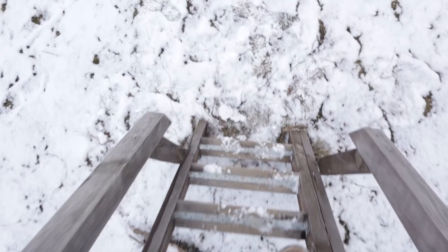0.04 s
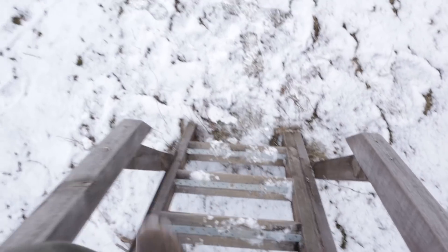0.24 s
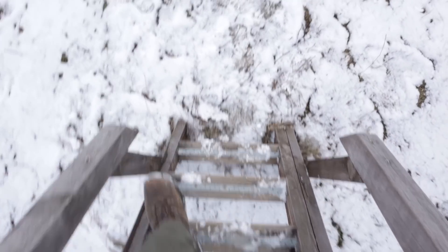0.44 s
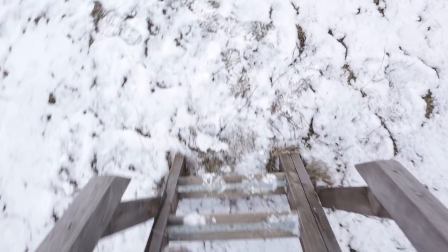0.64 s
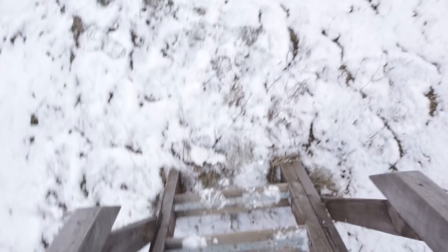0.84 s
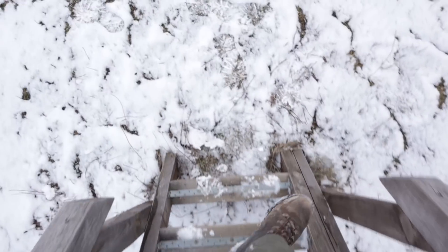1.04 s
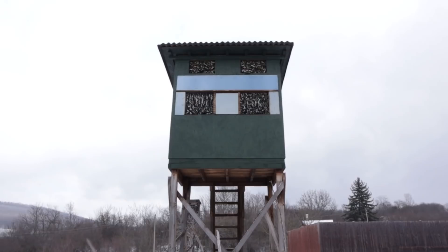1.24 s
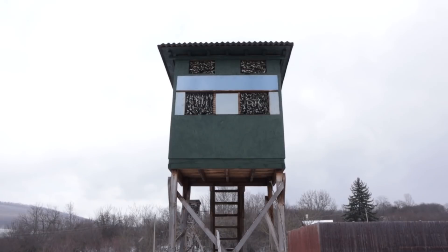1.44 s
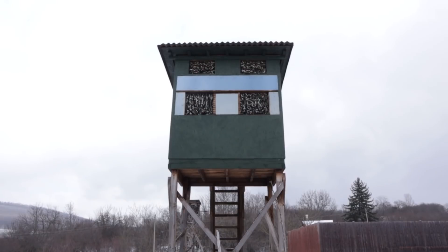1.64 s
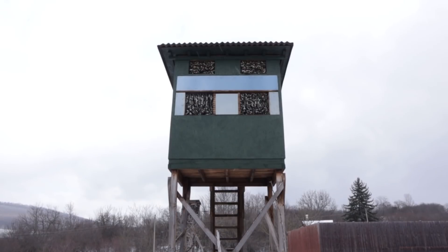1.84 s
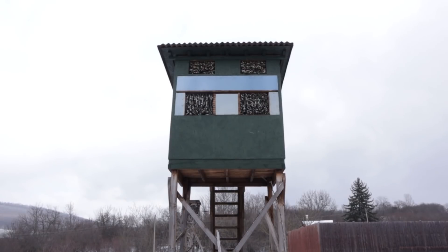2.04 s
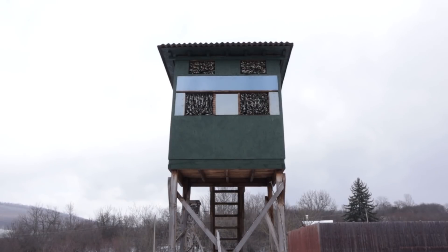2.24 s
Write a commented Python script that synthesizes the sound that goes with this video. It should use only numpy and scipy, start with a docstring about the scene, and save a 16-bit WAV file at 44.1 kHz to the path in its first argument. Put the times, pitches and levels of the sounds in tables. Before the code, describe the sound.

Close boot steps knock twice on a wooden ladder outdoors, with short scrapes and clothing rubbing along the rails. A brief snow crunch and low thuds follow, before a sudden change to soft wind and thin, far-off bird chirps.

```python
"""Boots climb down a snowy wooden ladder, close by. Soles knock and scrape on the rungs at 0.1 s and
again at 0.7 s, ringing the wood and cracking grit, while clothes rustle and rub along the rails.
Near 0.94 s snow crunches and the climber's weight lands with dull thuds. At 1.26 s the rustle cuts off,
leaving quiet open air: a low breeze, a few distant birds and a far-off hush."""
import sys
import numpy as np
from scipy import signal
from scipy.fft import rfft, irfft
from scipy.io import wavfile

SR = 44100
rng = np.random.default_rng(int(sys.argv[2]) if len(sys.argv) > 2 else 0)


def put_to_file(sound):
    """Save the sound as 16-bit audio at rate SR, in the file named by the first command-line argument."""
    columns = np.atleast_2d(sound).T  # one column per channel
    safe = np.clip(columns, -1, 1)
    whole_steps = np.round(safe * 32767)
    wavfile.write(sys.argv[1], SR, whole_steps.astype(np.int16))


N = 105840


def undb(db):
    """Decibels to gain."""
    return 10 ** (np.asarray(db) / 20)


def seconds():
    """Time of every sample."""
    return np.arange(N) / SR


def envelope(points):
    """Gain along (t/s, level/dB) points."""
    return undb(np.interp(seconds(), *np.array(points).T))


def colour(x, points):
    """Filter by (f/Hz, level/dB) points, keeping the power of white noise."""
    hz, db = np.array(points).T
    f = np.maximum(np.fft.rfftfreq(N, 1 / SR), 1)
    skirts = np.minimum(f / hz[0], 1) ** 2 * np.minimum(hz[-1] / f, 1) ** 2
    gain = undb(np.interp(np.log(f), np.log(hz), db)) * skirts
    return irfft(rfft(x) * gain / np.sqrt(np.mean(gain ** 2)), N)


def noise(points):
    """Coloured noise, unit RMS."""
    return colour(rng.standard_normal(N), points)


def wander(rate_hz):
    """Random drift, spread near 1."""
    knots = rng.standard_normal(N)
    return np.interp(seconds() * rate_hz, np.arange(N), knots)


def decay(t, t60_s):
    """Exponential decay from t = 0."""
    return (t >= 0) * np.exp(-np.log(1000) * np.maximum(t, 0) / t60_s)


def swell(start_s, length_s):
    """Rounded rise and fall."""
    progress = np.clip((seconds() - start_s) / length_s, 0, 1)
    return np.sqrt(np.maximum(np.sin(np.pi * progress), 0))


def slips(rate_hz=2500, scatter_db=2):
    """Dense, uneven stick-slip clicks, unit RMS."""
    hits = rng.random(N) < rate_hz / SR
    clicks = hits * undb(scatter_db * rng.standard_normal(N)) * rng.choice([-1, 1], N)
    return clicks / clicks.std()


# Sole on rung: t/s, level/dB, f/Hz, relative ring/dB, relative clack/dB, relative grit/dB
RUNG_CONTACTS = [(.1025, -17.5, 687, -2.5, -9, -15.5), (0.1299, -27, 1460, -18, -1, -13.5),
                 (0.143, -13.5, 1390, -8.5, -25, -22.5), (0.1505, -52, 1490, 10, -17, -22),
                 (0.1671, -29.5, 2020, -21, -24, -17), (0.1721, -29.5, 537, 8.5, -5, -26),
                 (.1876, -34.5, 596, -12, -13, -18), (.2342, -35.5, 790, 8, -20, -16),
                 (.2475, -34.5, 1760, -20, -23, -19), (.324, -40.5, 674, 5, -15, -3.5),
                 (0.3287, -29, 473, 8.5, -9, -22.5), (0.7261, -21, 590, 3.5, -2.5, -18.5),
                 (0.7456, -32.5, 810, 0, -3, -14), (0.765, -33.5, 1400, 0, -12, -6.5),
                 (.7905, -40, 1370, -3, -3, -21)]
# Ladder modes: f/Hz, relative level/dB, t60/s
LADDER_MODES = [(191, -22, 0.069), (283, -10, 0.067), (340, 2.5, 0.049), (530, -11, 0.038),
                (630, -14, 0.026), (690, -4, 0.11), (820, -3, 0.052), (980, -16, 0.039), (1220, -29, .05),
                (1340, -8, 0.069), (1532, 3, 0.11), (1780, 0, .05), (3040, 0, .03), (3760, 7, .03)]
# Cracking grit: f/Hz, level/dB
GRIT_SPECTRUM = [(300, -0.5), (1500, 8.5), (2400, -1), (3200, -5), (4100, -4), (4800, -5), (5500, -5.5),
                 (6800, -13), (8200, -7.5), (9500, -20), (15000, -19)]


def knocks(width_cycles=.44, phase_rad=.15, clack_hz=1607, modes_db=-15, frame_db=-2):
    """Each contact is a short push that rings the ladder, clacks the hard sole and cracks grit."""
    t = seconds()
    direct, drive, grit = np.zeros((3, N))
    for start_s, db, hz, ring_db, clack_db, grit_db in RUNG_CONTACTS:
        cycles = (t - start_s) * hz
        pulse = np.exp(-.5 * (cycles / width_cycles) ** 2)
        push = undb(db) * pulse * np.cos(2 * np.pi * cycles + phase_rad)
        touch_s = t - start_s + .5 / hz  # from half a cycle before the pulse peak
        clack = decay(touch_s, t60_s=.014) * np.sin(2 * np.pi * clack_hz * touch_s)
        direct += push + undb(db + clack_db) * clack
        drive += undb(ring_db) * push * 2 / pulse.sum()
        grit += undb(db + grit_db) * decay(touch_s, t60_s=.036)
    modes = sum(undb(db) * decay(t, t60_s) * np.sin(2 * np.pi * hz * t)
                for hz, db, t60_s in LADDER_MODES)
    frame = rng.standard_normal(N) * decay(t, t60_s=.099)  # dense ring of rails and joints
    ring = signal.fftconvolve(drive, undb(modes_db) * modes + undb(frame_db) * frame)[:N]
    return direct + ring + grit * noise(GRIT_SPECTRUM)


# Weight on the frame: t/s, level/dB, f/Hz, attack/s, t60/s
FRAME_LOADS = [(0.174, -52, 141, .003, 0.047), (0.3293, -44, 330, 0.0011, 0.22), (.73, -38, 171, .003, .13),
               (0.743, -36.5, 285.6, .004, .1), (.888, -33.5, 114.4, 0.019, 0.15),
               (0.9421, -24, 80.4, 0.0037, 0.14), (0.9445, -25.5, 165, 0.0019, 0.055),
               (0.9453, -26, 260, 0.0018, 0.048), (1.008, -31.5, 169.7, 0.0078, 0.15),
               (1.019, -33.5, 113, 0.0083, 0.18), (1.036, -37, 75.3, .02, 0.17)]


def thuds():
    """Low, quickly damped swings of the frame under the climber's weight."""
    out = np.zeros(N)
    for start_s, db, hz, attack_s, t60_s in FRAME_LOADS:
        t = seconds() - start_s
        rise = np.clip(t / attack_s, 0, 1)
        fall = decay(np.maximum(t - attack_s, 0), t60_s)
        out -= undb(db) * rise * fall * np.sin(2 * np.pi * hz * t)
    return out


# Slides on a rung: t/s, length/s, level/dB, relative grit/dB
SOLE_SLIDES = [(0.106, 0.025, -45.5, -6), (.127, 0.014, -37, -18), (0.147, 0.015, -41.5, -15),
               (0.17, 0.008, -35.5, -16), (0.208, 0.05, -55.5, -4), (0.76, 0.015, -39.5, -21),
               (0.786, 0.012, -42, -12), (0.804, 0.065, -68, 12)]
# Sole friction: f/Hz, level/dB
SOLE_SPECTRUM = [(80, -26), (180, 1), (550, -8), (950, -13), (1480, 1.5), (1900, -15), (2600, -15),
                 (5000, -31)]


def scrapes():
    """The sole judders over the wood, grinding grit."""
    rubbing, grit = np.zeros((2, N))
    for start_s, length_s, db, grit_db in SOLE_SLIDES:
        slide = swell(start_s, length_s)
        rubbing += undb(db) * slide
        grit += undb(db + grit_db) * slide
    return colour(slips() * rubbing, SOLE_SPECTRUM) + colour(slips() * grit, GRIT_SPECTRUM)


# Snow crushed underfoot: t/s, length/s, squeak/dB, fizz/dB
SNOW_CRUNCHES = [(0.275, .004, -72, -64), (0.79, 0.0015, -54, -51), (0.87, 0.0053, -51, -61),
                 (0.931, 0.0055, -43, -48.5), (.937, .007, -42, -72)]
# Snow squeak: f/Hz, level/dB
SQUEAK_SPECTRUM = [(200, -11), (450, 3), (850, -6), (1300, -14.5), (2400, -18), (6000, -28.5)]


def snow():
    """Packed snow gives way with a dull squeak and a bright fizz."""
    squeak, fizz = np.zeros((2, N))
    for start_s, length_s, squeak_db, fizz_db in SNOW_CRUNCHES:
        crush = swell(start_s, length_s)
        squeak += undb(squeak_db) * crush
        fizz += undb(fizz_db) * crush
    return colour(slips() * squeak, SQUEAK_SPECTRUM) + fizz * slips()


# Cloth rustle; duller rub on wood: t/s, level/dB
RUSTLE_LEVELS = [(0, -56.5), (.07, -55), (.12, -57.5), (.21, -62.5), (.25, -58), (.31, -66.5), (.42, -65),
                 (.52, -57), (.58, -58.5), (.63, -63), (.71, -78), (.77, -55), (.87, -55), (.9, -75),
                 (1.0, -82), (1.14, -62.5), (1.26, -62.5)]
RUB_LEVELS = [(0, -61), (.09, -55.5), (.2, -52), (.3, -57.5), (.44, -59), (.51, -56), (.6, -64.5),
              (.7, -59), (.8, -52.5), (.9, -59), (.98, -59), (1.07, -54.5), (1.25, -56.5)]
# Rustle; rub: f/Hz, level/dB
RUSTLE_SPECTRUM = [(200, -4), (500, 2.5), (1500, 4), (3000, -4), (6000, -1.5), (8300, -3), (10000, -9.5),
                   (12500, -9.5), (15500, -22)]
RUB_SPECTRUM = [(80, 3), (200, -3), (400, -2), (600, 0), (780, 1), (1000, -7), (2200, -6.5), (3000, -15),
                (8000, -28), (15000, -51)]


def clothes(grain_db=1.55, stop_s=1.259, ramp_s=.004):
    """Cloth rustles and rubs along the rails, then cuts off."""
    grain = undb(grain_db * wander(rate_hz=120))
    rustle = envelope(RUSTLE_LEVELS) * noise(RUSTLE_SPECTRUM)
    rub = envelope(RUB_LEVELS) * noise(RUB_SPECTRUM)
    gate = np.clip((stop_s - seconds()) / ramp_s + .5, 0, 1)
    return (rustle + rub) * grain * gate


# Bird notes: t/s, length/s, start f/Hz, middle f/Hz, end f/Hz, relative level/dB
BIRD_NOTES = [(1.122, .02, 6300, 6100, 5900, -61), (1.378, .048, 3850, 4050, 4650, -64),
              (1.427, .02, 3450, 3700, 3500, -64), (1.44, .068, 3300, 2830, 2480, -62),
              (1.455, .032, 3750, 3650, 3400, -62), (1.486, .03, 6950, 7530, 6980, -63),
              (1.494, .026, 3050, 2800, 2500, -60), (1.89, .08, 6700, 6550, 6300, -74),
              (2.05, .115, 6650, 6380, 5700, -70), (2.1, .11, 2280, 2330, 2300, -71),
              (2.225, .15, 2380, 2300, 2330, -71)]


def birds(gain_db=-1.5, waver_ratio=.014, flicker_db=2.5, echo_db=-6):
    """Thin, wavering whistles glide through three pitches; trees scatter a soft echo."""
    song = np.zeros(N)
    for start_s, length_s, *pitches_hz, db in BIRD_NOTES:
        progress = np.clip((seconds() - start_s) / length_s, 0, 1)
        glide_hz = np.polyval(np.polyfit([0, .5, 1], pitches_hz, 2), progress)
        hz = glide_hz * (1 + waver_ratio * wander(rate_hz=400))
        song += undb(db) * np.sin(np.pi * progress) * np.sin(2 * np.pi * np.cumsum(hz) / SR)
    song *= undb(gain_db + flicker_db * wander(rate_hz=150))
    trees = rng.standard_normal(N) * decay(seconds(), t60_s=.3)
    echo = signal.fftconvolve(song, trees / np.linalg.norm(trees))[:N]
    return song + undb(echo_db) * echo


# Breeze strength: t/s, level/dB
BREEZE_LEVELS = [(0, -52), (.4, -61), (.8, -51), (1.22, -55), (1.3, -46), (1.42, -53), (1.58, -52.5),
                 (1.8, -57), (2.05, -53), (2.2, -59), (2.35, -50.5)]
# Breeze rumble: f/Hz, level/dB
BREEZE_SPECTRUM = [(12, -4.5), (30, 3.5), (70, -3), (120, -5), (220, -14.5), (400, -25.5), (900, -67)]


def breeze(flutter_db=2):
    """Low wind swells and flutters."""
    flutter = undb(flutter_db * wander(rate_hz=20))
    return envelope(BREEZE_LEVELS) * flutter * noise(BREEZE_SPECTRUM)


# Far-off hush: t/s, level/dB
HUSH_LEVELS = [(1.3, -95), (1.6, -77), (1.8, -75), (1.95, -67), (2.1, -70.5), (2.4, -75)]
# Hush; still air; hiss: f/Hz, level/dB
HUSH_SPECTRUM = [(250, 2), (600, 3), (1100, -0.5), (2000, -18), (4000, -23)]
AIR_SPECTRUM = [(120, -10), (200, -5.5), (534, -13), (630, -12), (874, -18.5), (1400, -20.5), (2290, -21.5),
                (2650, -22.5), (4260, -24), (15500, -26.5)]
HISS_SPECTRUM = [(59, -54), (100, -26), (205, -7.5), (326, -5), (370, -1), (487, -5.5), (5870, -4.5),
                 (15500, -2.5)]


def open_air(air_db=-62, hiss_db=-69):
    """Still air, a far-off hush and a faint hiss in opposite polarity left and right."""
    air = undb(air_db) * noise(AIR_SPECTRUM)
    hush = envelope(HUSH_LEVELS) * noise(HUSH_SPECTRUM)
    hiss = undb(hiss_db) * noise(HISS_SPECTRUM)
    return air + hush + hiss * np.array([[1], [-1]])


def scene():
    """All sources centred; only the hiss is wide."""
    return knocks() + thuds() + scrapes() + snow() + clothes() + birds() + breeze() + open_air()


def record(dry):
    """Steep low-pass on the top treble."""
    cutoff_hz = 15800
    return signal.sosfilt(signal.ellip(10, .2, 70, cutoff_hz, fs=SR, output="sos"), dry)


dry = scene()
out = record(dry)
put_to_file(out)
```